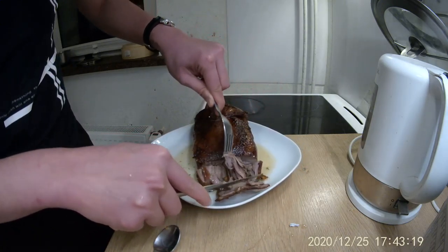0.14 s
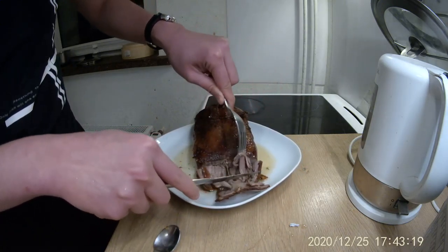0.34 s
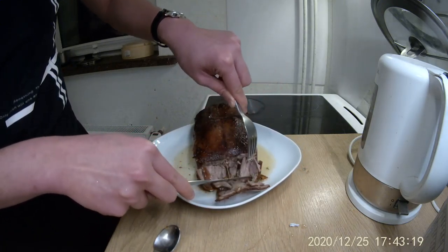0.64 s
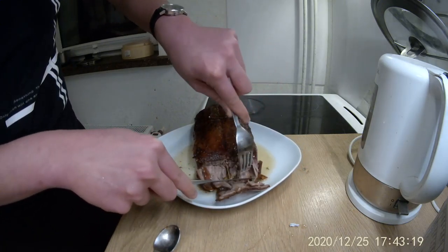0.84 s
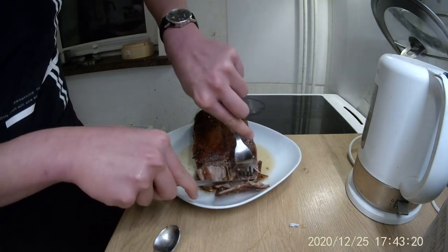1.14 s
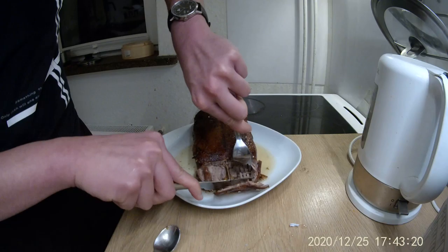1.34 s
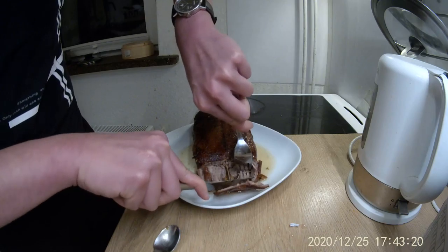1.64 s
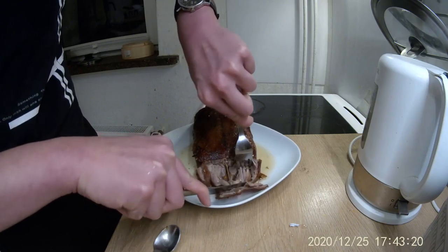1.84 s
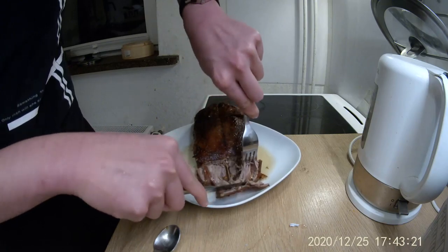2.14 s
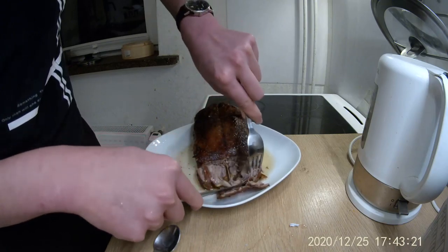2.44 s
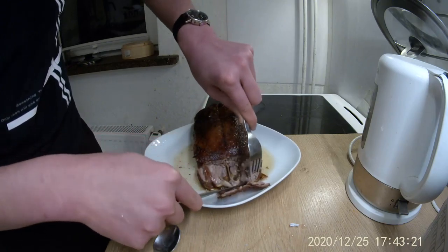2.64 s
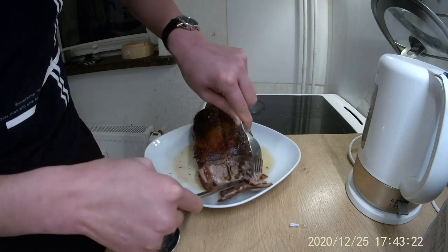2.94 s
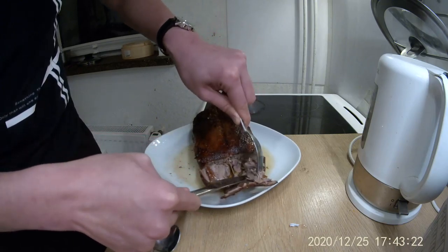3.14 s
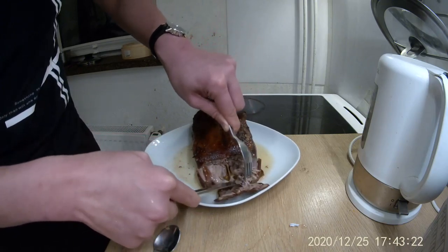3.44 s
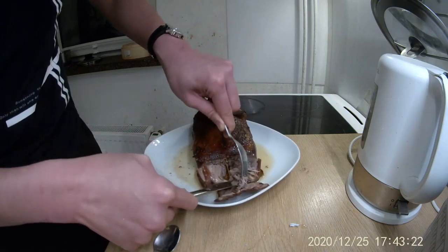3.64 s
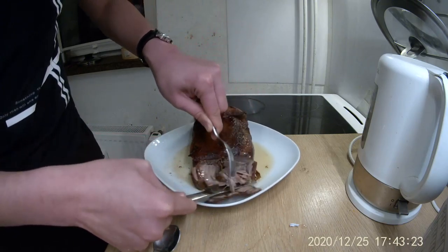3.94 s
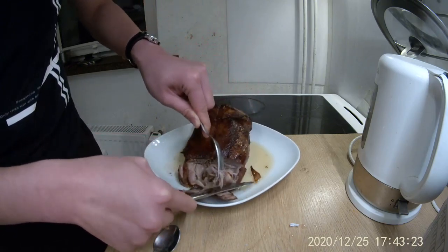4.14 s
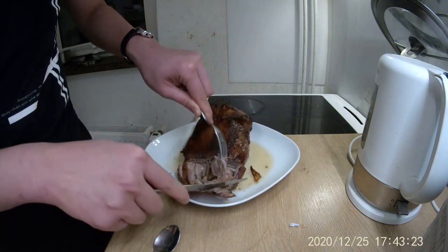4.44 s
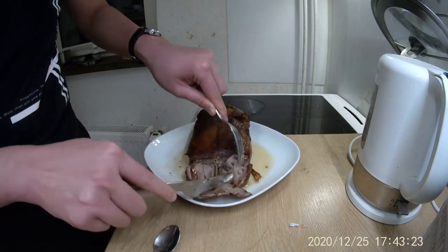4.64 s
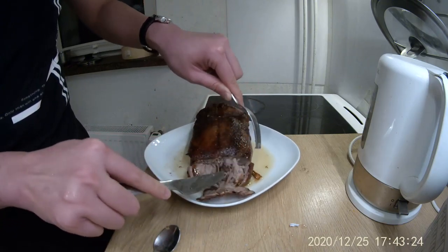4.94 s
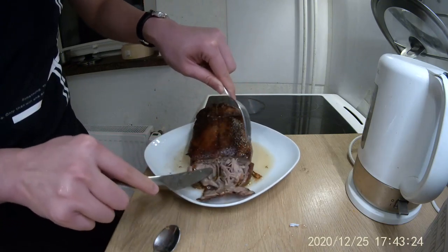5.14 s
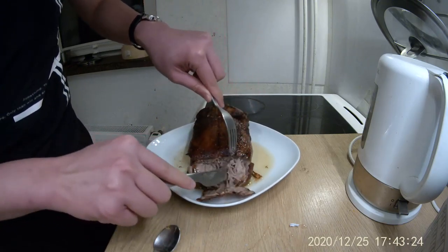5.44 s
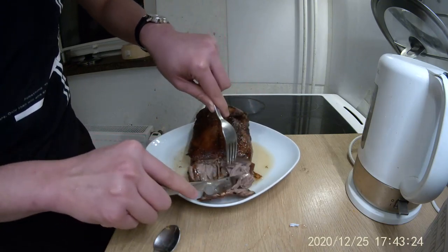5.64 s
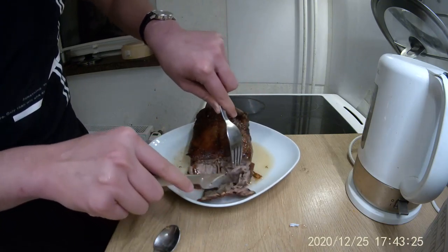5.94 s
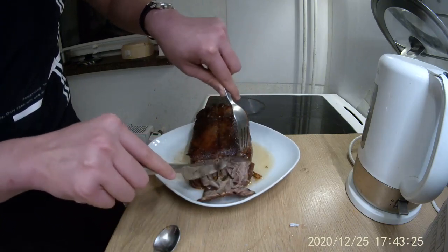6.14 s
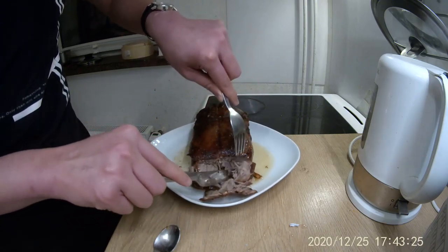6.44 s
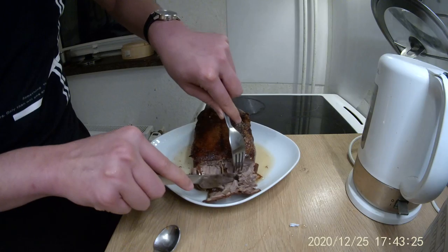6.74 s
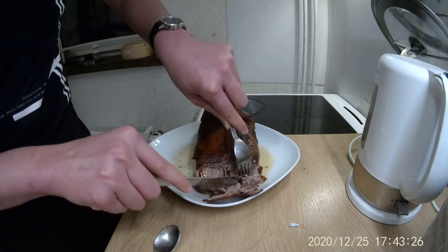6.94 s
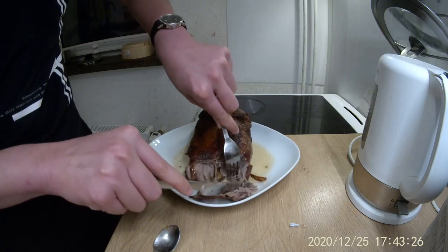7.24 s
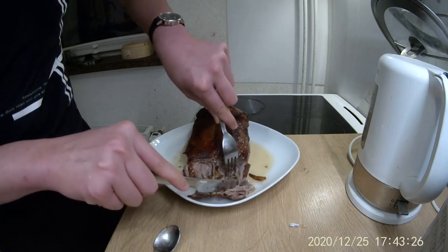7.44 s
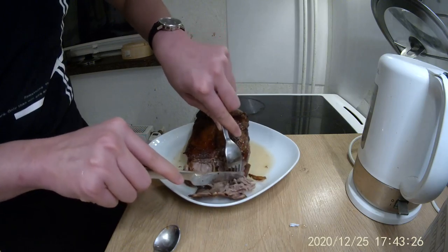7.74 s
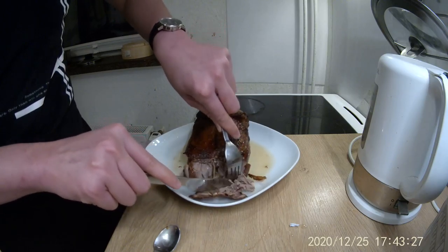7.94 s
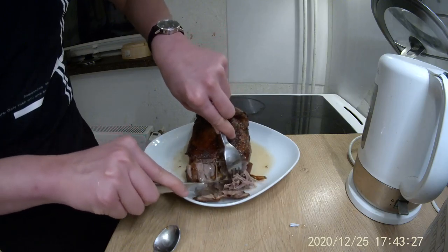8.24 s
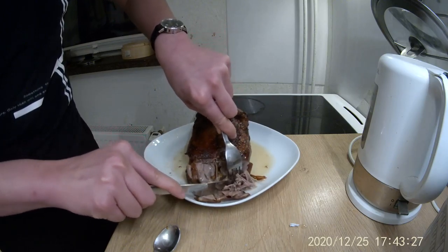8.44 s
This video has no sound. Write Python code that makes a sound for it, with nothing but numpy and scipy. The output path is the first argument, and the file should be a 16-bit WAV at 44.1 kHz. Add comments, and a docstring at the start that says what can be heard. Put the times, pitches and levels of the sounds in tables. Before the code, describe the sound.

Quiet stereo sound of meat being carved on a plate. Soft fibrous rubbing and wet crackling open it, followed by a muffled plate thump and a sharp high click of knife against fork. A mostly subdued stretch follows with small bumps, then a medium clink and, right after, a startlingly loud clank of blade on china, fading fast into the small hard-walled room, with faint handling at the end.

```python
"""A knife blade clinks on a china plate, once very hard: damped plate modes ring after a short noisy crack.
Steel ticks on steel as high, brief noise bursts; the plate bumps on a wooden worktop as dull bursts and modes.
Roast meat being pulled apart rubs as uneven noise and crackles wetly as random impulses.
Noise coloured as soft room rumble and hiss lies beneath; two closely spaced microphones hear the small kitchen."""
import sys
import numpy as np
from scipy import signal
from scipy.fft import rfft, irfft, next_fast_len
from scipy.io import wavfile

SR = 44100
rng = np.random.default_rng(int(sys.argv[2]) if len(sys.argv) > 2 else 0)


def persist_wave(psi):
    """Save psi, clipped to +-1, as 16-bit WAV."""
    counts = np.round(np.clip(psi, -1, 1) * 32767).astype(np.int16)
    wavfile.write(sys.argv[1], SR, np.atleast_2d(counts).T)


N = 378819
TIME = np.arange(N) / SR  # s, from the start of the scene
AGE = np.arange(SR * 3 // 4) / SR  # s, from the start of one sound


def from_db(db):
    """Decibel law: 20 dB is a tenfold amplitude."""
    return 10 ** (np.asarray(db) / 20)


def rms_one(x):
    """Normalisation of the effective value to 1."""
    return x / np.sqrt(np.mean(x ** 2) + 1e-20)


def at_hz(points, hz):
    """Interpolation of a table on a log-frequency axis."""
    table_hz, value = np.transpose(points)
    return np.interp(np.log(np.maximum(hz, 1)), np.log(table_hz), value)


def bins(x):
    """Fourier analysis: the frequencies [Hz] that make up a signal."""
    return np.fft.rfftfreq(x.shape[-1], 1 / SR)


def colour(x, spectrum, tilt_db=0):
    """Linear filtering: shape a spectrum, tilt it in dB per octave, and bring it to rms 1."""
    hz = bins(x)
    gain = from_db(at_hz(spectrum, hz) + tilt_db * np.log2(hz + 1))
    return rms_one(irfft(rfft(x) * gain, x.shape[-1]))


def dying(t60):
    """Exponential decay: the amplitude falls by 60 dB in t60 seconds."""
    return np.exp(-np.log(1000) * AGE / max(t60, 1e-3))


def burst(spectrum, rise, t60, tilt_db=0):
    """High modal density: many crowded modes struck together act as noise that swells and dies."""
    swell = np.minimum(AGE / max(rise, 1e-4), 1)
    noise = colour(rng.standard_normal(len(AGE)), spectrum, tilt_db)
    return noise * swell * dying(t60)


def ringing(modes, favour_db=0, free=1):
    """Modal superposition: one dying sine for each mode, each starting at its own phase."""
    hz, mode_db, t60 = np.transpose(modes)
    phases = rng.uniform(0, 2 * np.pi, len(hz))
    gains = from_db(mode_db + favour_db)
    sines = (g * np.sin(2 * np.pi * f * AGE + p) * dying(t * free)
             for g, f, p, t in zip(gains, hz, phases, t60))
    return sum(sines)


def add(track, s, sound):
    """Superposition: sounds that overlap simply add."""
    start = max(round(s * SR), 0)
    track[start:start + len(sound)] += sound[:N - start]


def drift(rate):
    """Random modulation: straight lines between chance values of spread 1, rate values a second."""
    knots = rng.standard_normal(int(TIME[-1] * rate) + 2)
    return np.interp(TIME * rate, np.arange(len(knots)), knots)


def microphones(x, balance, left_lag_s=0.00013):
    """Interaural-type cues: level differs between microphones by frequency, and the left hears later."""
    size = next_fast_len(N + 100)
    hz = np.fft.rfftfreq(size, 1 / SR)
    half_db = at_hz(balance, hz) / 2
    left = from_db(half_db) * np.exp(-2j * np.pi * hz * left_lag_s)
    right = from_db(-half_db)
    return irfft(rfft(x, size) * np.array([left, right]), size)[:, :N]


# reverberation time of the kitchen: (frequency [Hz], decay by 60 dB [s])
REVERBERATION = [(100, 0.13), (500, 0.36), (1500, 0.35), (4000, 0.36), (8000, 0.27), (15000, 0.42)]


def kitchen(x, wet_db=-7, build_s=0.0064, own_share=.45):
    """Diffuse reverberation: dense echoes of hard walls die octave by octave."""
    noise = rng.standard_normal((3, len(AGE)))
    spectra, hz, tail = rfft(noise), bins(noise), 0
    octave = np.clip(np.log2((hz + 1) / 125), 0, 7)
    # the treble differs more between the microphones: own_share is the power share four octaves up
    own = np.clip(own_share * octave / 4, 0, 1)
    spectra = np.sqrt(1 - own) * spectra[2] + np.sqrt(own) * spectra[:2]
    for k in range(8):
        fade = dying(at_hz(REVERBERATION, 125 * 2 ** k)) * np.minimum(AGE / build_s, 1)
        band = irfft(spectra * np.maximum(1 - abs(octave - k), 0), len(AGE))
        tail = tail + band * fade / np.linalg.norm(fade)
    echoes = signal.fftconvolve(x[None], tail, axes=1)[:, :N]
    return x + from_db(wet_db) * echoes


# spectrum of the room rumble: (frequency [Hz], relative level [dB per Hz])
RUMBLE_SPECTRUM = [(20, 6), (50, 3.5), (80, 4), (120, -1), (160, -11.5), (240, -8), (320, -1), (430, -3.5),
                   (540, -11), (720, 0.5), (980, 0), (1400, -4.5), (2000, -10), (5000, -77.5)]
# spectrum of the microphone hiss: (frequency [Hz], relative level [dB per Hz])
HISS_SPECTRUM = [(30, 12), (300, 8.5), (1200, 1), (2500, 1), (5000, -3), (9000, -5.5), (15000, -8)]


def background(rumble_db=-59.5, hiss_db=-59.5, left_db=4.0):
    """Coherence: both microphones share the steady room rumble, but each has its own hiss."""
    rumble = from_db(rumble_db) * colour(rng.standard_normal(N), RUMBLE_SPECTRUM)
    hiss = from_db(hiss_db) * colour(rng.standard_normal((2, N)), HISS_SPECTRUM)
    return microphones(rumble, [(1, left_db)]) + hiss


def stroke(start, length, attack_s=.06, ease_db_per_length=6.5):
    """Envelope of one stroke: pressure builds up, holds, then eases off, slower for a longer stroke."""
    age = TIME - start
    attack = np.clip(age / attack_s, 0, 1)
    release = from_db(-ease_db_per_length * np.clip(age / length - 1, 0, 20))
    return attack * release


# strokes of knife and fork through the meat, length counted from the start:
# (start [s], length [s], rubbing level [dB], wet crackle level [dB])
MEAT_STROKES = [(-.05, 0.069, -54.5, -66), (0.24, 0.28, -62.5, -66), (0.507, 0.072, -65, -60),
                (0.683, 0.17, -51, -60), (1.37, 0.24, -63.5, -76), (1.95, 0.2, -56, -71),
                (2.64, 0.68, -64, -65.5), (4.394, 0.072, -64, -69), (4.966, 0.2, -71, -70.5),
                (5.887, 0.033, -58.5, -67), (7.53, 0.46, -69, -74)]
# spectrum of the rubbing: (frequency [Hz], relative level [dB per Hz])
RUB_SPECTRUM = [(50, -17), (115, 6.5), (160, -1.5), (205, -2), (290, -2), (420, 0), (750, 0.5),
                (1400, -5.5), (2200, -14), (5000, -37), (15000, -51.5)]
# spectrum of the wet crackle: (frequency [Hz], relative level [dB per Hz])
WET_SPECTRUM = [(1000, -27), (2500, 10.5), (5300, 8), (8000, -5), (14000, -3)]


def meat(rough_db=3.5, drag_changes_per_s=45, pops_per_s=1400, size_db=4.5, resting_db=-69.5):
    """Friction noise and random impulses: fibres drag unevenly under the blade as films of juice pop."""
    pressure = np.array([stroke(start, length) for start, length, _, _ in MEAT_STROKES])
    levels = from_db(np.array(MEAT_STROKES)[:, 2:].T)
    rubbing, wetness = np.sqrt(levels ** 2 @ pressure ** 2)  # the powers of the strokes add
    rubbing = np.hypot(rubbing, from_db(resting_db))  # cutlery held in the meat between strokes
    rub = colour(rng.standard_normal(N), RUB_SPECTRUM)
    rub = rub * from_db(rough_db * drift(drag_changes_per_s))
    sizes = from_db(size_db * np.minimum(rng.exponential(1, N), 5)) * rng.choice([-1, 1], N)
    pops = colour(sizes * (rng.random(N) < pops_per_s / SR), WET_SPECTRUM)
    return rub * rubbing + pops * wetness


# plate pressed against the worktop: (time [s], worktop thump [dB], plate clunk [dB], rise [s])
PLATE_BUMPS = [(.002, -63, -56.5, 0.0021), (2.2389, -42.5, -39.5, .0008), (2.718, -54, -50, .0016),
               (2.751, -56, -46.5, 0.016), (3.471, -81, -55.5, 0.0096), (3.614, -61, -58, 0.018),
               (4.534, -48, -49.5, .006), (5.017, -55, -51, 0.011), (6.745, -56.5, -53.5, 0.0058),
               (6.966, -33, -40, 0.0029), (7.885, -52, -67, 0.0094), (8.17, -55, -77, 0.014),
               (8.342, -79, -64, .005), (8.389, -59, -82, 0.0062)]
# spectrum of the worktop thump: (frequency [Hz], relative level [dB per Hz])
THUMP_SPECTRUM = [(60, -41), (95, -11.5), (124, 9), (158, -12), (205, -1.5), (280, -10.5), (400, -3.5),
                  (600, -21.5), (1200, -26.5), (4000, -56.5)]
# spectrum of the dull plate clunk: (frequency [Hz], relative level [dB per Hz])
CLUNK_SPECTRUM = [(50, -31), (200, -6), (600, -8.5), (1020, 7), (1220, 2), (1320, 14), (1430, -15),
                  (1600, -7.5), (2000, -3.5), (2330, -9), (2800, -10.5), (6000, -38), (15000, -48)]
# low modes of the loaded plate on the worktop: (frequency [Hz], relative level [dB], decay by 60 dB [s])
WORKTOP_MODES = [(121, 2, .36), (203, -6, .2), (243, -7, .2), (334, -6, .26), (425, -6, .18)]
# the plate's ring after a dull blow: (frequency [Hz], relative level [dB], decay by 60 dB [s])
DULL_PLATE_MODES = [(1310, -11, .3), (1518, -2, .07), (2288, -14, .22), (3300, -19, .1)]


def bumps(worktop_db=-5, plate_db=4.5, worktop_rise=.008, t60=0.17, low_hz=85):
    """Soft impact: in blows cushioned by the meat, the worktop thumps and the plate gives a dull clunk."""
    out = np.zeros(N)
    for s, thump_db, clunk_db, rise in PLATE_BUMPS:
        peak = np.exp(np.log(1000) * rise / t60)  # makes up for the decay during the rise
        worktop_swell = np.minimum(AGE / worktop_rise, 1)
        worktop_ring = from_db(worktop_db) * ringing(WORKTOP_MODES) * worktop_swell
        thump = peak * burst(THUMP_SPECTRUM, rise, t60) + worktop_ring
        plate_ring = from_db(plate_db) * ringing(DULL_PLATE_MODES) * np.minimum(AGE / rise, 1)
        clunk = peak * burst(CLUNK_SPECTRUM, rise, t60) + plate_ring
        add(out, s, from_db(thump_db) * thump + from_db(clunk_db) * clunk)
    # the stiff worktop gives little below its lowest mode
    return signal.sosfilt(signal.butter(3, low_hz, "high", fs=SR, output="sos"), out + 1e-18)


# knife against fork tines: (time [s], level [dB], brightness [dB per octave], decay by 60 dB [s])
STEEL_TICKS = [(.3697, -41, -4, .018), (.5068, -43.5, -1.5, .018), (1.1135, -50, -7, .022),
               (1.1349, -52, -7, .022), (1.8428, -56, -7, .08), (1.8752, -58, 4, .02),
               (2.6385, -20.5, 0, .028), (2.6445, -24, 1, .024), (2.663, -40, 4, .1),
               (3.3768, -55, -1, .015), (5.512, -55, -8, .025), (5.779, -54, -6, .01),
               (6.6544, -57, -2, .02)]
# spectrum of the ringing steel: (frequency [Hz], relative level [dB per Hz])
STEEL_SPECTRUM = [(20, -120), (1000, -30), (2200, -38), (2650, -21), (3900, -15.5), (4450, -0.5),
                  (4900, -7), (5400, -6.5), (5950, 3.5), (6700, -13), (7500, -12), (8250, 2), (8700, -12),
                  (9500, -47), (15000, -53)]
# bright snap of the steel edges meeting: (frequency [Hz], relative level [dB per Hz])
SNAP_SPECTRUM = [(2000, -10), (5000, -29), (9000, 10), (15000, 10)]


def ticks(rise=0.00022, snap_db=-20, snap_db_per_tilt=5.5):
    """Damping by the hand: held steel rings high and briefly; brighter contacts snap more at the edges."""
    out = np.zeros(N)
    for s, level_db, tilt_db, t60 in STEEL_TICKS:
        snap_gain = from_db(snap_db + snap_db_per_tilt * tilt_db)
        snap = snap_gain * burst(SNAP_SPECTRUM, rise, t60)
        ring = burst(STEEL_SPECTRUM, rise, t60, tilt_db)
        add(out, s, from_db(level_db) * (ring + snap))
    return out


# plate and blade modes, ringing freely: (frequency [Hz], relative level [dB], decay by 60 dB [s])
PLATE_MODES = [(440, -11, .19), (480, -7, .16), (735, -14, .24), (796, -9, .24), (917, -6, .22),
               (1490, -8, .15), (1553, 1, .18), (1600, -5, .14), (1675, -17, .22), (2277, -4, .24),
               (2400, -7, .2), (2518, 0, .21), (2720, -18, .2), (3241, 0, .17), (3315, -2, .24),
               (3900, -11, .15), (4112, -1.5, .26), (4355, -7, .24), (4848, -6, .2), (5117, -6, .2),
               (5785, -15, .23), (6040, -11, .25), (6450, -18, .25), (7208, -13, .23), (7384, -16, .2),
               (8340, -11, .18), (8405, -13, .22), (9663, -26, .3), (10400, -29, .17), (10920, -28, .24),
               (12500, -27, .24), (13950, -30, .24)]


def held_plate(width_hz):
    """Resonance broadening: the pressing blade damps every mode into a broad spectral peak."""
    hz = np.geomspace(100, 15000, 400)
    mode_hz, mode_db, _ = np.transpose(PLATE_MODES)
    peaks = from_db(mode_db) / (1 + ((hz[:, None] - mode_hz) / width_hz) ** 2)
    return np.column_stack([hz, 10 * np.log10(np.sum(peaks ** 2, axis=1))])


# blade on plate; the edge is an extra ring level near 2.8 kHz, the damping scales the free decay times:
# (time [s], ring [dB], crack [dB], brightness [dB per octave], edge [dB], damping [share of free decay])
BLADE_CLINKS = [(4.528, -47, -54, 0, 1, 0.63), (6.4652, -38, -25.5, -1.8, 8.5, 0.42),
                (6.9622, -14, -15, 0, 0, 1.0), (6.9675, -30, -9.5, -2.2, 0, .25),
                (6.9755, -34, -14.5, .5, 0, .3), (7.504, -46, -35.5, 0, 0.5, 0.91)]


def clinks(width_hz=120, low_hz=170):
    """Impact excitation of modes: contact gives a short crack, then the plate rings as the blade lets go."""
    out = np.zeros(N)
    rise, crack_t60, contact_t60, edge_hz = .0012, .07, .09, 2800  # s, s, s, Hz
    octaves = np.log2(np.array(PLATE_MODES)[:, 0] / edge_hz)
    touch = np.minimum(AGE / rise, 1) * (.5 + dying(contact_t60))  # the first strength is lost fast
    crack_spectrum = held_plate(width_hz)
    for s, ring_db, crack_db, tilt_db, edge_db, free in BLADE_CLINKS:
        # hardness and place of the contact decide which modes it favours
        favour_db = tilt_db * octaves + edge_db * np.exp(-(2 * octaves) ** 2)
        ring = from_db(ring_db) * ringing(PLATE_MODES, favour_db, free) * touch
        crack = from_db(crack_db) * burst(crack_spectrum, rise, crack_t60, tilt_db)
        add(out, s, ring + crack)
    # a plate is too small to radiate deep bass
    return signal.sosfilt(signal.butter(4, low_hz, "high", fs=SR, output="sos"), out + 1e-18)


# left minus right microphone for clinks and ticks: (frequency [Hz], level difference [dB])
CUTLERY_BALANCE = [(60, 3), (250, 4.5), (500, 5.5), (900, 5.5), (1550, 7), (2000, 3.5), (2550, -6.5),
                   (3300, -9), (4100, -4), (5000, -6), (6400, -6), (8300, -15), (11000, -7)]


def scene(soft_left_db=3.0):
    """Superposition: everything on the plate sounds in the kitchen and reaches both microphones."""
    in_kitchen = kitchen(clinks(), wet_db=-8.0) + kitchen(ticks(), wet_db=-10.0)
    cutlery = microphones(in_kitchen, CUTLERY_BALANCE)
    handling = microphones(kitchen(bumps() + meat(), wet_db=-3), [(1, soft_left_db)])
    return cutlery + handling + background()


def record(dry, cutoff_hz=15300):
    """Overload and band limiting: peaks beyond full scale are clipped, then the top is cut."""
    low_pass = signal.ellip(10, .1, 80, cutoff_hz, fs=SR, output="sos")
    return signal.sosfilt(low_pass, np.clip(dry, -1, 1))


dry = scene()
out = record(dry)
persist_wave(out)
```